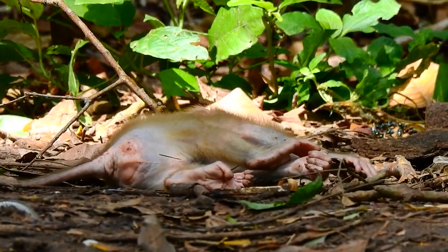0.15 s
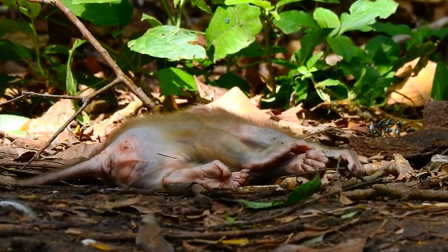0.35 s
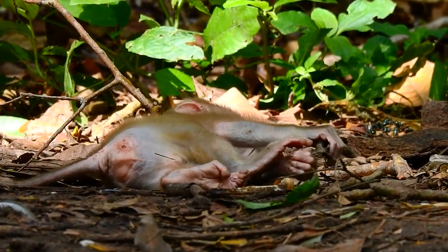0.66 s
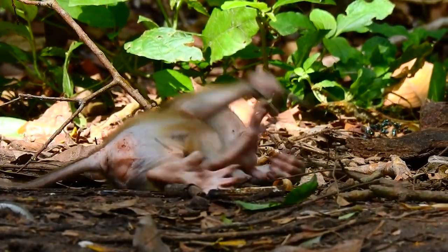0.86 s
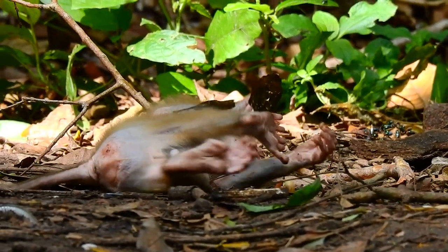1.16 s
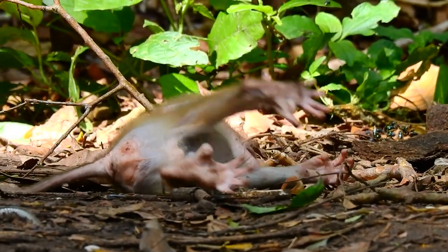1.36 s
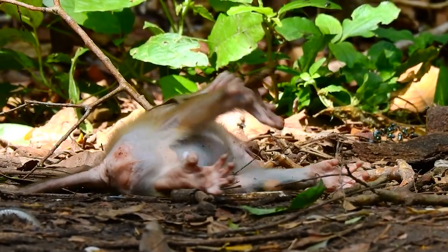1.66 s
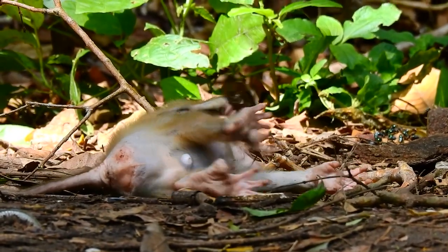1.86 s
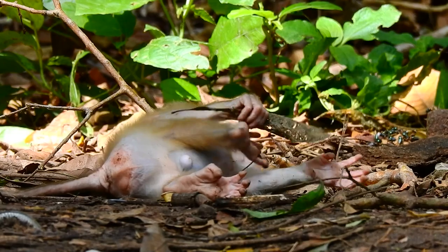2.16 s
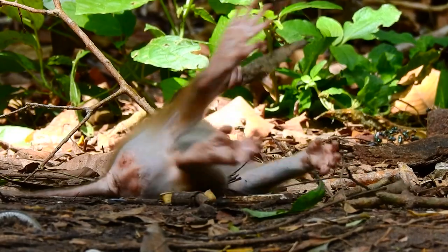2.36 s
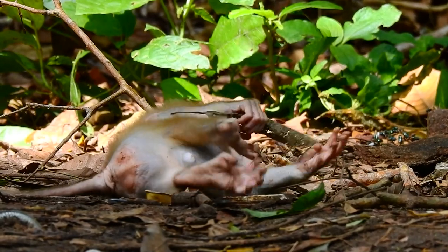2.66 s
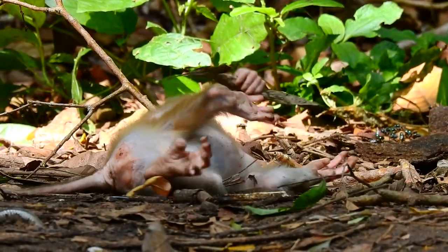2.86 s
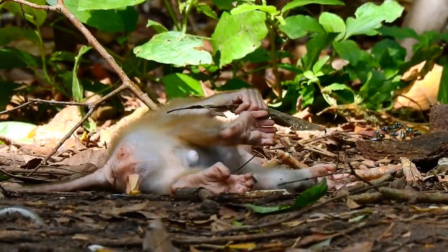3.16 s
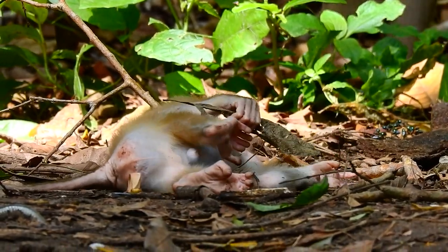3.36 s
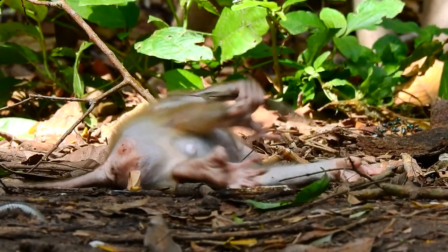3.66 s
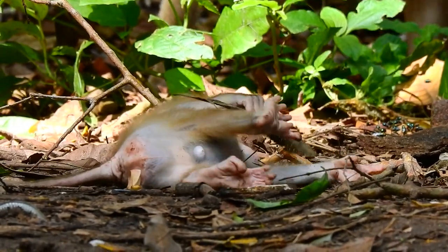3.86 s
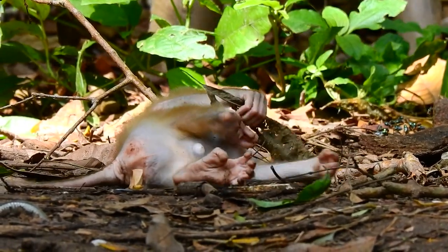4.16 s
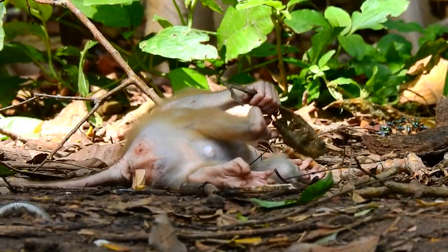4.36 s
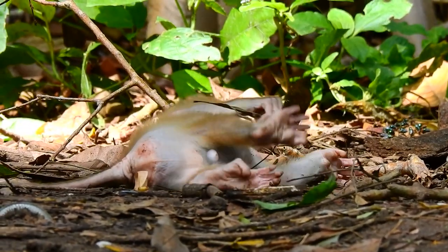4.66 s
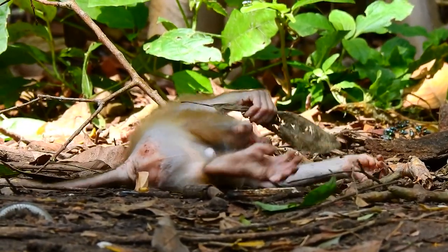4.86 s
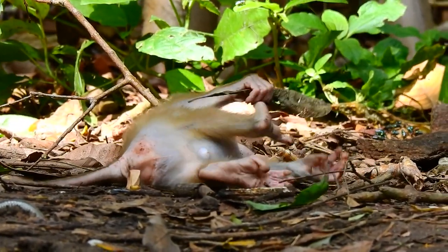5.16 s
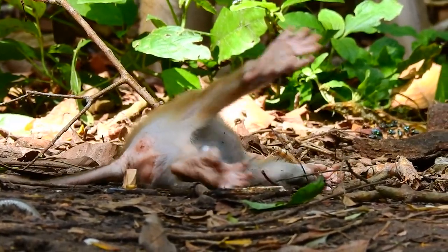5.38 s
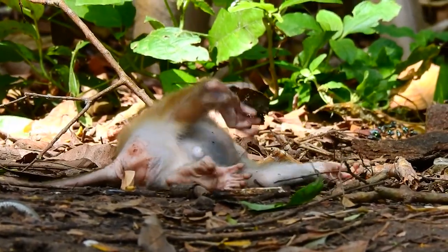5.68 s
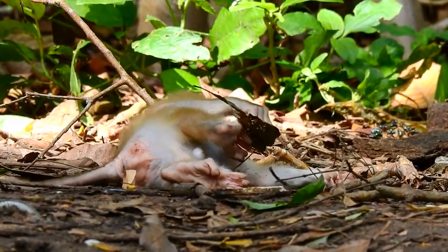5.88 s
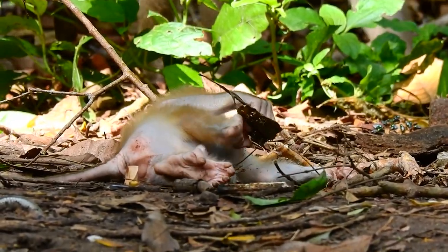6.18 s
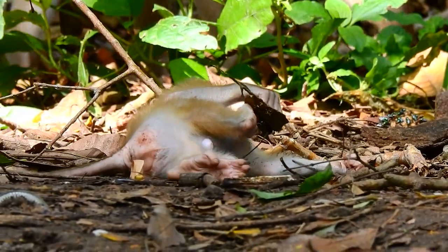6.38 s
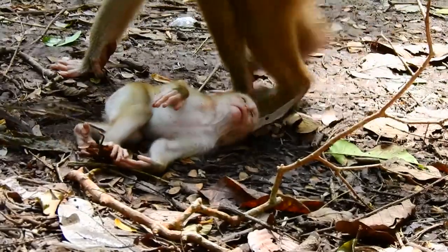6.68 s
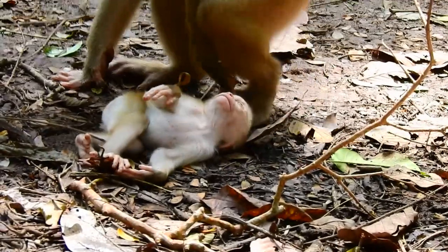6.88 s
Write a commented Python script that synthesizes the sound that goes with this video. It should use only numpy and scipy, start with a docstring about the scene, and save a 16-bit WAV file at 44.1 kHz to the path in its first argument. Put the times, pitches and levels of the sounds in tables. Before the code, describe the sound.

Outdoors on a forest floor, dry leaves crackle and faint birds whistle over a low rumble and insect hiss. After about a second a baby monkey begins rapid, harsh, high squeaks, roughly four per second, close to the microphone with bright echoes from the trees. The calls stop, everything drops silent briefly, then quieter ambience returns with a thin chirp.

```python
"""A baby monkey calling on a forest floor

About four times a second the monkey calls. By the source-filter principle a rasp of uneven throat pulses
excites resonances; short harmonic squeaks break through it, and delayed, scattered copies answer from the trees.
Shaped noise makes the distant rumble and insect hiss, gliding sines the far birds, decaying noise bursts
the dry leaves. Near the end the sound drops out for a moment and returns with a quieter background."""
import sys
import numpy as np
from scipy import signal
from scipy.fft import rfft, irfft, next_fast_len
from scipy.io import wavfile
from scipy.ndimage import uniform_filter1d, map_coordinates

SR = 44100
rng = np.random.default_rng(int(sys.argv[2]) if len(sys.argv) > 2 else 0)


def log_audio(samples):
    """Write samples as a 16-bit WAV file to the path given in sys.argv[1]."""
    # one column per channel
    frames = np.atleast_2d(samples).T
    # limit to full scale, then quantise
    limited = np.clip(frames, -1, 1)
    pcm = np.round(limited * 32767).astype(np.int16)
    wavfile.write(sys.argv[1], SR, pcm)


N = 309758  # samples


def amp(db):
    """Decibel law: amplitude ratio of a level."""
    return 10 ** (np.asarray(db) / 20)


def unit(x):
    """Normalization to an rms of 1."""
    return x / np.sqrt(np.mean(x ** 2) + 1e-20)


def along(points, hz):
    """Interpolation of (Hz, value) points on a logarithmic frequency axis."""
    point_hz, value = np.transpose(points)
    return np.interp(np.log(hz + 1), np.log(point_hz + 1), value)


def curves(rows):
    """Linear envelopes: one value per sample for each column after the time."""
    times, *columns = np.transpose(rows)
    return [np.interp(np.arange(N) / SR, times, column) for column in columns]


def wobble(rate_hz):
    """Band-limited modulation: a smooth random curve with rate_hz knots a second."""
    knots = rng.standard_normal(int(N * rate_hz / SR) + 4)
    return map_coordinates(knots, [np.arange(N) * rate_hz / SR])


def filtered(x, response):
    """Linear filtering: the spectrum of x times a complex response of frequency."""
    m = next_fast_len(N + SR)
    return irfft(rfft(x, m) * response(np.fft.rfftfreq(m, 1 / SR)), m)[..., :N]


# Likeness of the two channels of diffuse noise: frequency_hz, likeness (1 = identical; below 0 is taken as 0)
LIKENESS = [(60, 0.98), (180, 0.96), (550, 0.91), (1650, 0.68), (4970, 0.38), (15000, -1.1)]


def diffuse_noise(spectrum, patchy_db):
    """Diffuse-field coherence: stereo noise of rms 1, with random gain patches, less alike in the treble."""
    z = signal.stft(rng.standard_normal((2, N)), nperseg=512)[2]
    field = uniform_filter1d(rng.standard_normal(z.shape[1:]), size=6, axis=0)
    field = uniform_filter1d(field, size=10, axis=1)
    pair = signal.istft(z * amp(patchy_db * unit(field)), nperseg=512)[1][:, :N]

    def mid_side(hz):
        angle = np.arccos(np.clip(along(LIKENESS, hz), 0, 1)) / 2
        return amp(along(spectrum, hz)) * [np.cos(angle), np.sin(angle)]

    mid, side = filtered(pair, mid_side)
    return unit(np.array([mid + side, mid - side]))


# Background levels before their small random wobble:
# start_s, rumble_db, upper_db (gain of the rumble's upper part), hiss_db
BACKGROUND_LEVELS = [(0, -50, -3.5, -51.5), (1.2, -49, -0.5, -52.5), (1.7, -53, 7, -51.5),
                     (2.8, -51, 2.5, -53), (4.2, -50, -0.5, -52.5), (5.3, -50, -3.5, -53),
                     (6.3, -49, -9, -54.5), (6.5, -51.5, -7, -54.5), (7.02, -57.5, -4.5, -57.5)]
# Relative spectrum of the low rumble: frequency_hz, density_db (per Hz)
RUMBLE_SPECTRUM = [(18, -73), (30, -41), (44, -15.5), (92, -3), (140, 1), (250, -4.5), (400, -8.5),
                   (700, -16), (1540, -72)]
# Relative spectrum of the insect hiss: frequency_hz, density_db (per Hz)
HISS_SPECTRUM = [(410, -14), (700, -5), (1360, -6), (2030, -9.5), (3360, -11.5), (3820, -10.5), (5500, -6),
                 (6850, -3.5), (7900, -8), (8400, -16), (9600, -24.5), (15500, -39.5)]


def forest():
    """Spectral shaping: low rumble lumps, swells and changes colour under the even hiss of far insects."""
    rumble_db, upper_db, hiss_db = curves(BACKGROUND_LEVELS)
    rumble = diffuse_noise(RUMBLE_SPECTRUM, patchy_db=1.6)
    upper = filtered(rumble, lambda f: 1 / (1 + (270 / (f + 1)) ** 4))  # above about 270 Hz
    coloured = rumble + (amp(upper_db) - 1) * upper
    swell_db = 0.3 * wobble(3.89) + 0.66 * wobble(18)
    hiss = amp(hiss_db + 0.24 * wobble(4.2)) * diffuse_noise(HISS_SPECTRUM, patchy_db=2.5)
    return amp(rumble_db + swell_db) * coloured + hiss


# Far whistles: start_s, length_s, start_hz, end_hz, level_db (sine peak, before flutter), hoarseness (0-1)
BIRD_NOTES = [(.13, .24, 4170, 4220, -57.5, .3), (.505, .075, 3800, 3900, -57.5, .1),
              (.68, .26, 4350, 4500, -57.5, .3), (6.52, .24, 5180, 5150, -59, .7),
              (6.604, .034, 6550, 5100, -48.5, .2)]


def birds():
    """Amplitude modulation: gliding thin sines; fast random flutter smears a hoarse note."""
    out, flutter = np.zeros(N), wobble(120)
    for start_s, length_s, start_hz, end_hz, level_db, hoarse in BIRD_NOTES:
        u = np.arange(round(length_s * SR)) / (length_s * SR)  # progress 0-1
        at = slice(round(start_s * SR), round(start_s * SR) + len(u))
        phase = 2 * np.pi * np.cumsum(start_hz + (end_hz - start_hz) * u) / SR
        envelope = np.sqrt(np.sin(np.pi * np.sqrt(u)))
        roughness = 1 - hoarse + hoarse * flutter[at]
        out[at] += amp(level_db) * envelope * roughness * np.sin(phase)
    return out


# Dry leaves and twigs: start_s, level_db (nominal peak), pitch_hz, length_s (time to fall 20 dB)
LEAF_CRACKS = [(0.11, -37.5, 4200, 0.034), (0.142, -35.5, 1640, 0.036), (0.346, -48, 7000, .012),
               (0.452, -28.5, 6200, 0.0078), (0.583, -39.5, 6950, 0.017), (0.771, -37, 1500, 0.024),
               (1.413, -39, 6200, 0.0069), (1.593, -37.5, 1000, .015), (6.578, -47, 2500, 0.0089),
               (6.85, -47, 4500, 0.0091)]


def leaves():
    """Impulsive excitation: each crack is noise around its own pitch, quick to rise and dying away."""
    out, t = np.zeros(N + SR), np.arange(4096) / SR
    f = np.fft.rfftfreq(len(t), 1 / SR)
    band = (f > 700) / (1 + (f / 8200) ** 8)
    for start_s, level_db, pitch_hz, length_s in LEAF_CRACKS:
        colour = 0.24 + 1 / (1 + ((f - pitch_hz) / (0.19 * pitch_hz)) ** 2)
        noise = unit(irfft(rfft(rng.standard_normal(len(t))) * colour * band))
        decay = amp(level_db - 3.5 - 20 * t / length_s)
        rise = 1 - np.exp(-8 * t / length_s)
        out[round(start_s * SR):][:len(t)] += decay * rise * noise
    return out[:N]


# Reverberation of the wood: frequency_hz, t60_s (time to fall 60 dB)
WOOD_DECAY = [(1000, 0.27), (2600, 0.27), (4500, 0.7), (7000, 0.86), (10000, 0.39)]
# Colour of what the trees send back: frequency_hz, gain_db
TREE_COLOUR = [(800, -9), (3200, -2), (4200, -3), (7200, 1), (9000, 11)]


def trees(x, trunk_db=-12, tail_db=-9):
    """Echo and reverberation: a near trunk answers once; stirring leaves scatter a long, bright tail."""
    hz, t, z = signal.stft(rng.standard_normal((2, SR)), SR, nperseg=256)
    tail = signal.istft(z * amp(-60 * t / along(WOOD_DECAY, hz)[:, None]), SR, nperseg=256)[1]
    tail[1] = .5 * tail[0] + np.sqrt(.75) * tail[1]  # the two sides are half alike
    tail /= np.linalg.norm(tail[0])
    stirred = np.pad(x * (.6 + .9 * wobble(900)), (200, 0))[None]  # 200 samples late
    wood = signal.fftconvolve(stirred, tail, axes=1)[:, :N]
    trunk = np.pad(x, (round(.039 * SR), 0))[:N]  # 39 ms late
    return filtered(amp(tail_db) * wood + amp(trunk_db) * trunk, lambda f: amp(along(TREE_COLOUR, f)))


def resonate(x, modes):
    """Resonance: each mode acts twice for steep skirts; alternating signs leave no null between neighbours."""
    def response(f):
        total = 0
        for k, (centre_hz, width_hz, db) in enumerate(modes):
            once = 1j * f * width_hz / (centre_hz ** 2 - f * f + 1j * f * width_hz)
            total = total + (-1) ** k * amp(db) * once ** 2
        return total

    return unit(filtered(x, response))


def closings(hz, scatter_db):
    """Pulse excitation: one click of random size per cycle, the sizes, and the place (0-1) in the cycle."""
    cycles = np.cumsum(hz) / SR
    size = amp(scatter_db * rng.standard_normal(N))[cycles.astype(int)]
    clicks = np.diff(np.floor(cycles), prepend=0)
    return unit(size * clicks), size, cycles % 1


# Calls, with levels before the overall rasp level: start_s, rise_s (first push reached), second_s (second push
# begins), length_s, first_db, sag_db (drop below first_db), second_db, upper_db (re middle), lower_db
CALLS = [(0.952, 0.0058, 0.045, 0.079, -44.5, 9, -51.5, 10.5, -36.5),
         (1.171, 0.012, 0.052, 0.11, -37, -3, -32, 4, -33.5),
         (1.431, 0.0078, 0.049, 0.12, -34, 3.5, -24.5, 2, -39.5),
         (1.716, 0.0069, 0.048, .100, -36, 21, -38, 5.5, -46.5),
         (1.955, 0.0087, 0.039, 0.069, -42, 13, -43, 5, -44.5),
         (2.149, 0.0043, 0.058, 0.083, -47.5, 11, -41.5, 8, -45.5),
         (2.366, 0.019, 0.061, 0.13, -38, 8, -28.5, 2, -40),
         (2.619, 0.01, 0.054, 0.13, -37, 7, -28, 4.5, -40),
         (2.888, .010, .055, 0.083, -37.5, 10, -42.5, 2.5, -46),
         (3.124, .008, .035, 0.081, -41, 7.5, -49.5, 2, -46.5),
         (3.336, 0.0071, 0.054, .085, -48, 14, -47.5, 3, -50),
         (3.556, 0.0095, 0.044, 0.077, -46, 8.5, -52, 4.5, -47),
         (3.756, 0.013, .055, .130, -38.5, 7.5, -27.5, 2.5, -40),
         (4.027, 0.017, 0.053, .130, -35, 5, -25, 2, -39.5),
         (4.300, 0.016, 0.056, 0.13, -36, 4, -27, -1.5, -42),
         (4.564, 0.014, 0.047, .130, -39.5, 1.5, -26.5, -0.5, -41),
         (4.822, .007, 0.051, 0.13, -36, 4.5, -26, -1, -40),
         (5.103, .008, 0.051, 0.15, -39, 9, -29, 2, -43),
         (5.402, 0.016, 0.059, 0.14, -32.5, 11, -30, 2.5, -44),
         (5.692, 0.0075, 0.061, 0.12, -44, 7.5, -37.5, 4.5, -47.5),
         (5.988, 0.0088, 0.06, 0.11, -54, 1, -46, 7, -47.5)]
# Added to the upper and lower resonances at seven moments: level_db each, at the start, first push,
# end of its hold, sag, second push, end of its hold, end of call; the lower ones swell into the sag
UPPER_OFFSETS_DB = (-2, -0.5, -2, -0.5, -2, -2.5, -1)
LOWER_OFFSETS_DB = (-17.5, -6, -2, -0.5, -5.5, -3, -15.5)
ONSET_DB, FADE_DB = 12.5, 23.5  # rise from the start, fall from the second push to the end
HOLD = 0.36  # share of the time from first peak to second push that holds before the sag
PUSH_S, PEAK_S = .016, 0.0031  # rise of the second push, its hold


def pushes():
    """Envelope control: levels of the middle, upper and lower resonances at seven moments of every call."""
    rows = []
    for start_s, rise_s, second_s, length_s, first_db, sag_db, second_db, upper_db, lower_db in CALLS:
        hold_end_s = rise_s + HOLD * (second_s - rise_s)
        top_s = min(second_s + PUSH_S, length_s - .012)
        times = start_s + np.array([0, rise_s, hold_end_s, second_s, top_s, top_s + PEAK_S, length_s])
        middle = np.array([first_db - ONSET_DB, first_db, first_db, first_db - sag_db,
                           second_db, second_db, second_db - FADE_DB])
        upper = middle + upper_db + UPPER_OFFSETS_DB
        rows += zip(times, middle, upper, lower_db + np.array(LOWER_OFFSETS_DB))
    return curves(rows)


# Throat and mouth resonances, in three groups: centre_hz, width_hz, level_db
MIDDLE_MODES = [(4550, 1300, 0)]
UPPER_MODES = [(6400, 1900, 0)]
LOWER_MODES = [(1000, 1000, -10), (2100, 1500, -4), (3200, 1300, 0)]


def rasp(level_db=-2, slap=.4, breathy=.85):
    """Source-filter principle: unsteady buzz, slapping folds and turbulence excite the resonances."""
    buzz_hz = 1090 * np.exp(.025 * wobble(500) + .07 * wobble(25))
    slap_hz = 470 * np.exp(.12 * wobble(200) + .12 * wobble(15))
    buzz = closings(buzz_hz, scatter_db=1.5)[0]
    slaps, size, place = closings(slap_hz, scatter_db=1.8)
    puffs = unit(size * (.4 + np.exp(-place / .3)))  # air flow falls within each slap cycle
    source = slap * slaps + puffs * (buzz + breathy * rng.standard_normal(N))
    sounding = np.zeros(N)
    for start_s, _, _, length_s, *_ in CALLS:
        sounding[round(start_s * SR):round((start_s + length_s) * SR)] = 1

    def ring(modes):
        return amp(1.8 * wobble(120)) * resonate(source, modes)  # the mouth never holds still

    middle_db, upper_db, lower_db = pushes()
    throat = amp(middle_db) * ring(MIDDLE_MODES)
    throat -= amp(upper_db) * ring(UPPER_MODES)
    throat -= amp(lower_db) * ring(LOWER_MODES)
    return amp(level_db) * uniform_filter1d(sounding, size=200) * throat


# Squeaks: start_s, length_s, start_hz, middle_hz, end_hz, level_db (second harmonic, before mouth,
# flutter and the final doubling), tilt_db (per harmonic up to the third); pitches before jitter
SQUEAK_NOTES = [(1.01, 0.025, 2850, 2900, 2880, -41, -6), (1.03, 0.018, 2440, 2430, 2380, -51, -15),
                (1.203, 0.027, 3370, 3310, 3320, -40, -11), (1.232, 0.019, 2006, 1944, 1920, -32.5, -1),
                (1.268, .018, 2130, 2310, 2800, -44.5, -3), (1.281, 0.019, 3140, 3140, 3120, -30.5, 7),
                (1.495, 0.014, 2386, 2166, 2130, -34, 5), (1.539, 0.015, 3960, 3650, 3740, -46.5, -8),
                (1.774, .016, 1757, 3050, 3800, -35, 5), (2.21, .021, 2010, 1900, 1910, -49, -8),
                (2.33, 0.048, 3520, 3600, 3200, -43.5, 21), (2.436, .026, 2400, 2230, 2230, -37, 2),
                (2.679, 0.04, 2270, 2310, 2370, -35.5, 4), (2.707, 0.024, 1835, 1836, 1840, -47.5, -8.5),
                (2.95, 0.021, 2584, 2237, 2350, -44, 9.5), (3.183, 0.03, 1780, 1860, 1830, -55.5, -12),
                (3.612, 0.027, 1830, 1857, 1877, -50, -7), (3.816, 0.032, 2125, 2150, 2130, -37.5, -2.5),
                (3.866, .022, 2650, 2790, 2800, -48, -7.5), (4.053, .019, 2197, 2115, 2120, -39, 0),
                (4.087, 0.024, 2195, 2430, 2330, -33.5, 4.5), (4.106, 0.014, 2176, 2220, 1910, -36, 7.5),
                (4.127, .022, 2044, 2150, 2120, -41.5, -2.5), (4.358, 0.03, 2150, 2380, 2026, -36.5, 2),
                (4.384, 0.028, 2040, 1590, 1587, -42, 5), (4.618, 0.017, 2180, 2286, 2270, -40, -0.5),
                (4.672, .009, 3030, 3230, 3450, -33.5, 1.5), (4.878, 0.029, 2151, 2175, 2197, -34, 1),
                (4.93, 0.016, 2055, 2170, 2180, -43, 2), (4.934, 0.017, 1980, 2780, 2770, -46, -4),
                (5.161, .024, 2163, 2146, 2260, -40, 0.5), (5.206, 0.02, 1880, 1970, 2130, -47.5, -9),
                (5.41, .033, 2200, 2346, 2360, -42.5, 1.5), (5.466, 0.039, 2530, 2560, 2430, -39.5, 3),
                (5.758, 0.019, 1850, 2020, 1960, -47.5, -6), (5.767, 0.025, 2010, 1720, 1404, -44, 4)]
# What the mouth does to a harmonic: frequency_hz, gain_db
MOUTH_GAIN = [(1500, -10.5), (2300, -16), (3300, -7), (4400, 0.5), (6500, -2.5), (8000, -9), (10000, -29)]
SWELL = 0.77  # exponent under 1: a squeak is loudest early


def squeaks(jitter=.012, flutter_db=2.8):
    """Mode locking: the folds briefly lock into a fast, unsteady whistle; the mouth weights its harmonics."""
    out = np.zeros(N)
    drift, flutter = np.exp(jitter * wobble(300)), amp(flutter_db * wobble(450))
    for start_s, length_s, start_hz, middle_hz, end_hz, level_db, tilt_db in SQUEAK_NOTES:
        u = np.arange(round(length_s * SR)) / (length_s * SR)  # progress 0-1
        at = slice(round(start_s * SR), round(start_s * SR) + len(u))
        pitch = np.interp(u, [0, .5, 1], [start_hz, middle_hz, end_hz]) * drift[at]
        phase = 2 * np.pi * np.cumsum(pitch) / SR
        tone = np.zeros(len(u))
        for k in (1, 2, 3, 4, 5):
            harmonic_db = level_db + tilt_db * (min(k, 3) - 2) + along(MOUTH_GAIN, k * pitch)
            tone += amp(harmonic_db) * np.sin(k * phase)
        envelope = np.sin(np.pi * u ** SWELL) ** 0.36
        out[at] += 2 * envelope * flutter[at] * tone
    return out


# Stereo balance of the direct voice: frequency_hz, left_minus_right_db
VOICE_BALANCE = [(300, 11.5), (1300, 1.5), (2400, 5), (4400, 1.5), (8000, -1.5)]
LIPS_HZ = 7570  # the whistle carries little above this; the rasp keeps a weak band beyond


def monkey():
    """Interchannel differences: the lower voice leans left; nearby leaves scatter it apart."""
    def lips(f):
        return 1 / (1 + (f / LIPS_HZ) ** 12)

    def to_sides(f):
        gain = amp(np.outer([.5, -.5], along(VOICE_BALANCE, f)))
        return gain * np.exp(np.outer([-1j, 1j], f * 4e-5))  # left about 13 microseconds later

    whistle = filtered(squeaks(), lips)
    locked = uniform_filter1d(np.abs(whistle), size=200)
    hoarse = rasp() / (1 + 40 * locked)  # the rasp gives way while the folds whistle
    voice = whistle + filtered(hoarse, lambda f: lips(f) + amp(-13) / (1 + (f / 11500) ** 5))
    near = filtered(np.array([voice, voice]), to_sides)
    litter = rng.standard_normal((2, 900)) * amp(-60 * np.arange(900) / SR / .025)  # 60 dB in 25 ms
    litter /= np.linalg.norm(litter, axis=1, keepdims=True)
    bright = np.diff(voice, prepend=0)[None]  # differencing favours the treble
    scattered = signal.fftconvolve(bright, litter, axes=1)[:, :N]
    return near + amp(-7) * scattered + trees(voice)


def scene():
    """Superposition: the sources add linearly."""
    return forest() + birds() + leaves() + monkey()


# Silent gap: start_s, end_s
SILENCE = (6.276, 6.521)
TOP_HZ = 15700  # band limit


def record(dry):
    """Gating and band limitation: a brief silence, and nothing kept above the band limit."""
    t = np.arange(N) / SR
    on = 1. * ((t < SILENCE[0]) | (t > SILENCE[1]))
    on = uniform_filter1d(on, size=100)  # soft edges
    return filtered(dry * on, lambda hz: hz < TOP_HZ)


dry = scene()
out = record(dry)
log_audio(out)
```